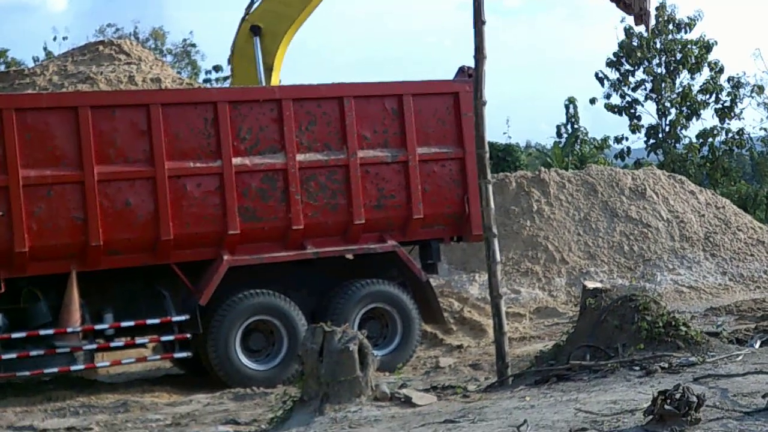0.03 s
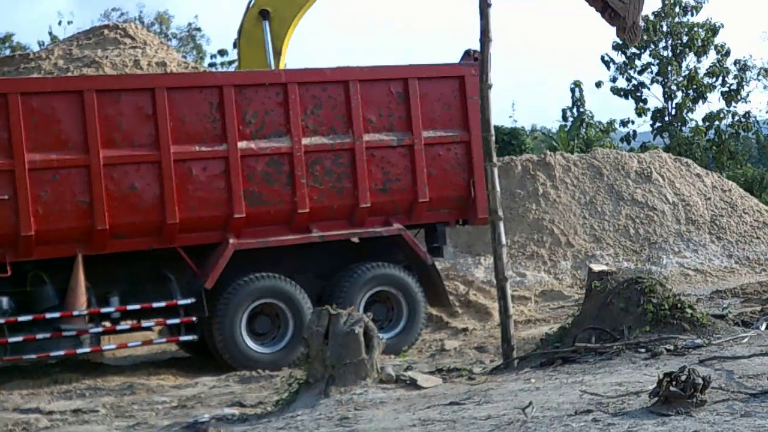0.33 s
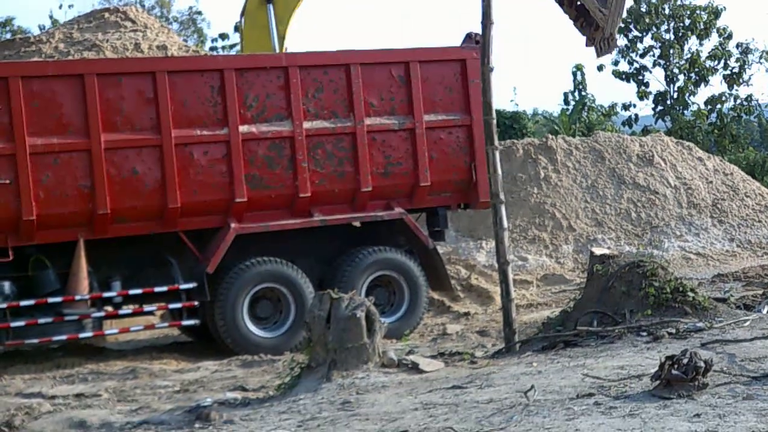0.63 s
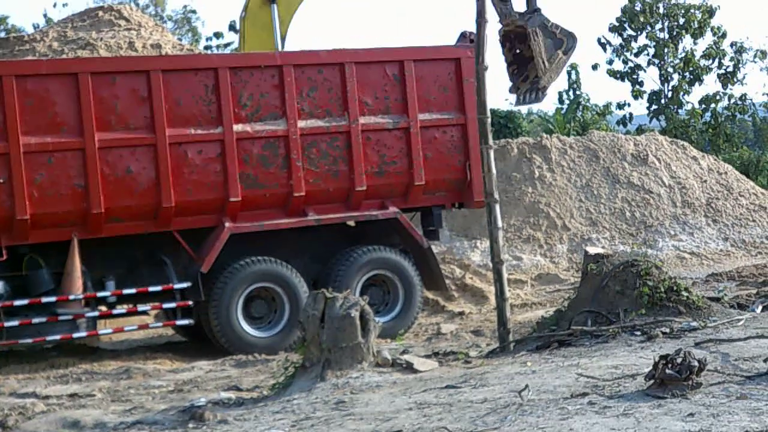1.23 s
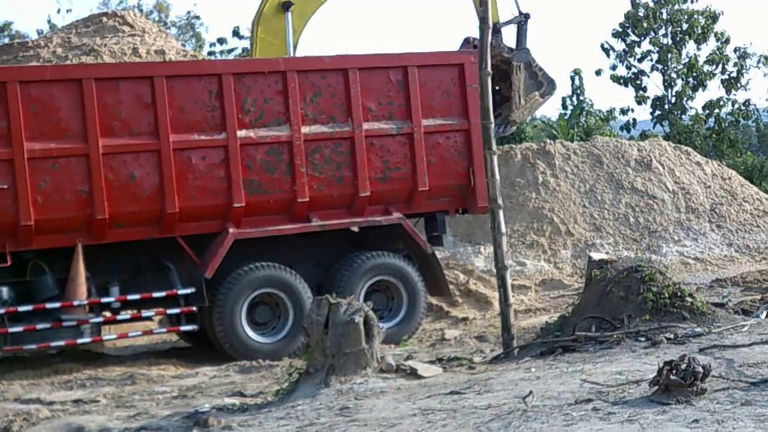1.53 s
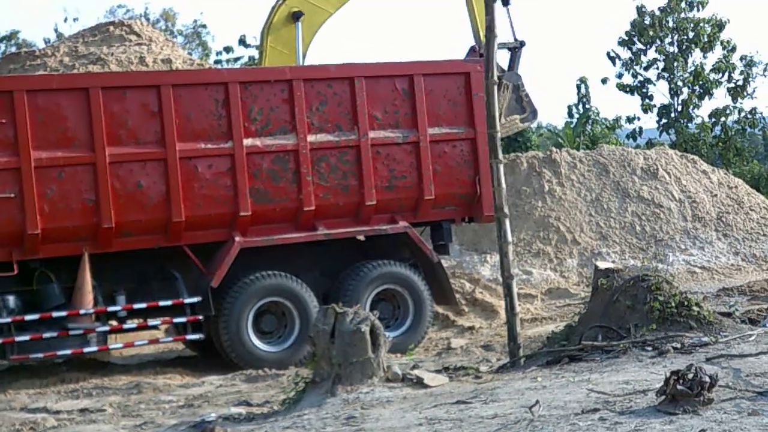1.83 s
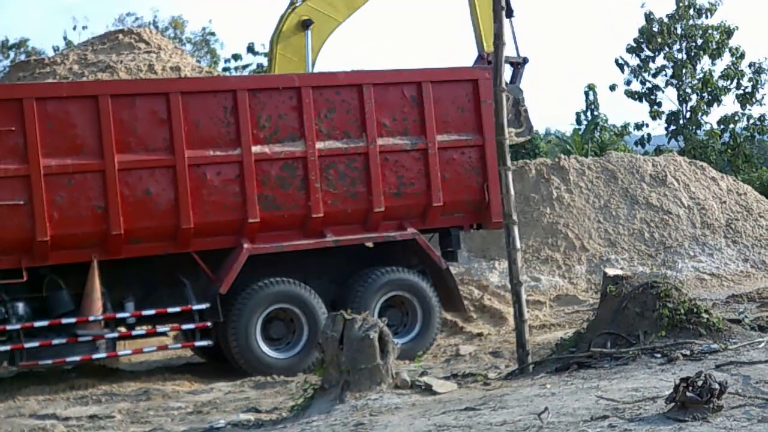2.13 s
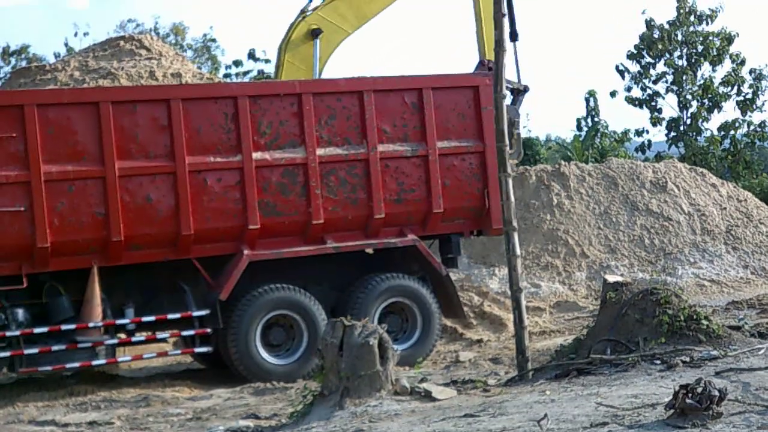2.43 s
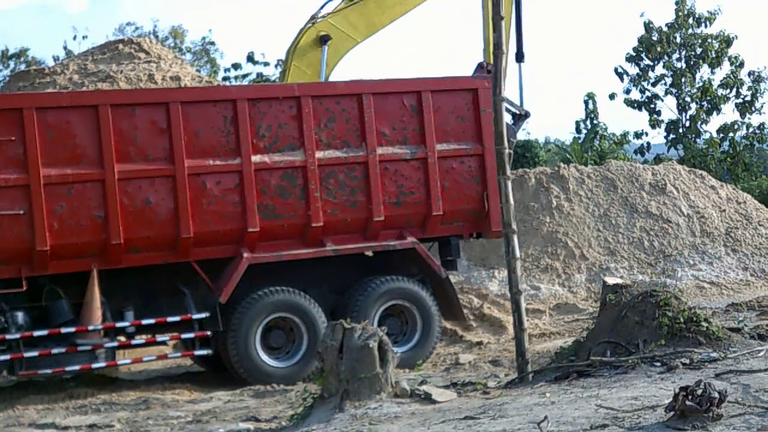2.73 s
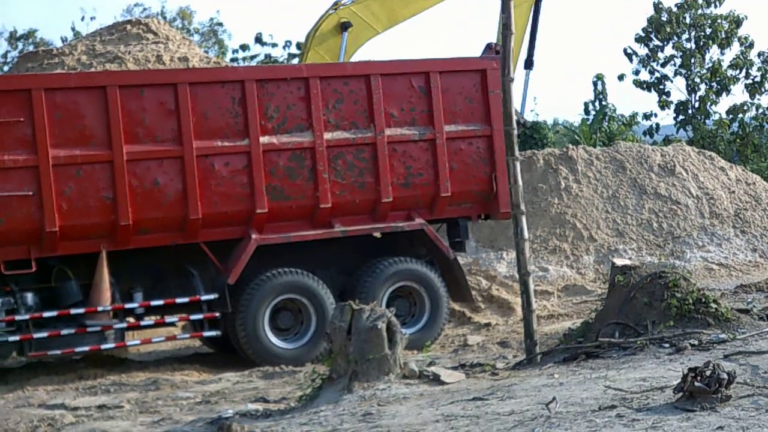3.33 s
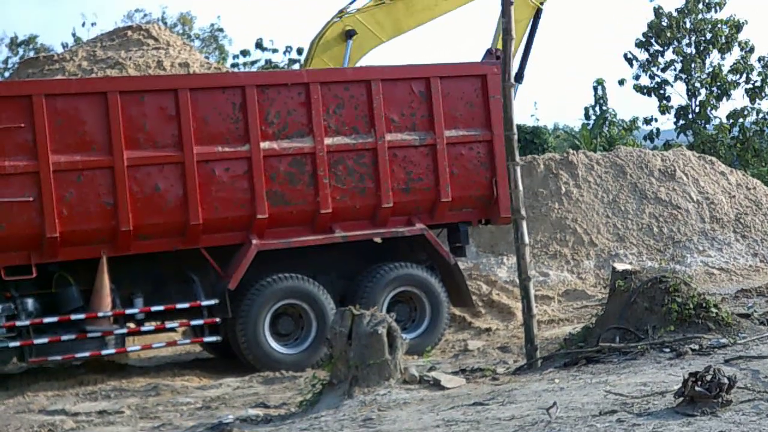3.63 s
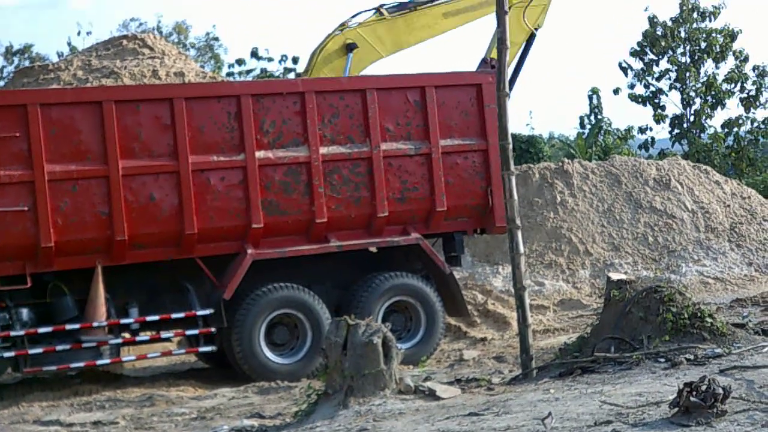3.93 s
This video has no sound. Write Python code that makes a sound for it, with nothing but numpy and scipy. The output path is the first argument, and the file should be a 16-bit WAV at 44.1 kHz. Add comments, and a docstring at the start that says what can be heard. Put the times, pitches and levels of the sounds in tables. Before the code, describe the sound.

An excavator's diesel engine drones and clatters for the whole four seconds, with faint hydraulic groans and whistles and a dump truck's low idle beneath. The engine sags slightly around 2.1 and 3.5 seconds. The steel bucket clanks in a quick cluster from about 2.1 to 2.6 seconds, then knocks lightly at 3.3. A distant bird chirps, barely audible, between 1.6 and 2.7 seconds.

```python
"""An excavator's diesel drones with fan and hydraulic pump, sagging twice under load.
Firings, pump and fan follow one crank; clatter rings the housing; the hydraulics groan and whistle.
A dump truck idles alongside: slow throb, injector ticks. From about 2 s the steel bucket clanks
in its linkage, ringing its modes and plates over open sandy ground. A small bird chirps far off."""
import sys
import numpy as np
from scipy import signal
from scipy.fft import rfft, irfft
from scipy.io import wavfile

SR = 44100
rng = np.random.default_rng(int(sys.argv[2]) if len(sys.argv) > 2 else 0)


def output_pcm(signal):
    """Save a mono or channel-first signal as 16-bit PCM at the path in sys.argv[1].

    Samples are clipped to [-1, 1] before scaling.
    """
    pcm = np.clip(np.atleast_2d(signal).T, -1, 1) * 32767
    wavfile.write(sys.argv[1], SR, np.round(pcm).astype(np.int16))


N = 176400
T = np.arange(N) / SR

# excavator firing rate: t/s, f/Hz
FIRING_HZ = [(0, 100.8), (.5, 100.1), (.7, 100.6), (1.3, 100.8), (1.7, 100.2), (2.12, 95.7), (2.55, 98.3),
             (2.9, 99.6), (3.1, 98.4), (3.3, 95.3), (3.5, 93.2), (3.75, 94.2), (4, 94.5)]
# firing note: t/s, level/dB
EXHAUST_DB = [(0, -27.5), (.7, -31), (1.15, -36.5), (1.5, -35), (1.8, -34.5), (2.4, -33.5), (3.0, -32),
              (3.35, -31.5), (3.6, -31), (4, -30)]
# weaker engine tones: multiple of crank rate, level/dB
ENGINE_ORDERS = [(1.5, -41), (2, -42), (4, -48), (4.5, -43.5), (5, -41), (6, -47)]
# pump tone: t/s, level/dB
PUMP_DB = [(0, -48), (1.1, -46), (1.35, -40), (1.75, -39), (2.0, -48), (2.8, -44), (3.3, -45.5), (3.6, -40),
           (3.85, -40.5), (4, -33.5)]
# fan tones: multiple of blade rate, level/dB
FAN_HARMONICS = [(1, -42), (2, -54.5), (3, -59.5)]
# fan gain as the cab swings: t/s, gain/dB
FAN_SWELL_DB = [(0, -4.5), (.25, 2), (.6, -0.5), (1.0, -2), (1.5, 3), (2.1, -1.5), (3.0, -1.5), (4, -3.5)]
# engine clatter: f/Hz, relative density/dB
CLATTER_SPECTRUM = [(210, -31.5), (310, -4.5), (355, 0), (435, -7.5), (475, -3.5), (520, -2), (584, -2),
                    (638, -1), (718, -1), (785, -5.5), (857, -9.5), (1040, -18), (1210, -21.5), (1440, -13),
                    (1670, -18), (1920, -23.5), (2250, -22.5), (2510, -28.5), (2770, -34), (2990, -40),
                    (3470, -43.5), (3680, -61), (4780, -67), (8100, -100)]
# engine clatter: t/s, level/dB
CLATTER_DB = [(0, -44), (.8, -44.5), (1.5, -44), (2.0, -44), (2.7, -42), (3.3, -43.5), (4, -45)]
# engine housing panels: f/Hz, width/Hz, level/dB
HOUSING_MODES = [(1392, 24, -66), (1515, 40, -61.5), (1600, 54, -73.5), (1745, 16, -71), (2050, 17, -74.5),
                 (2413, 10, -79.5), (2435, 30, -77), (2680, 11, -76)]
# exhaust rumble: f/Hz, relative density/dB
RUMBLE_SPECTRUM = [(12, -28.5), (24, -12.5), (33, -8.5), (39, -1), (46, 2.5), (54, -4), (63, 1.5),
                   (82, -3.5), (110, -4), (150, -5), (190, -6), (215, -6.5), (255, -9), (290, -11.5),
                   (330, -16.5), (400, -35), (600, -52.5)]
# exhaust rumble: t/s, level/dB
RUMBLE_DB = [(0, -30), (.55, -35), (1.0, -30), (1.35, -32), (2.1, -31), (2.7, -30.5), (3.1, -31.5),
             (4, -29)]
# hydraulic groans and whistles: t/s, length/s, start f/Hz, end f/Hz, level/dB
HYDRAULIC_GLIDES = [(.15, 0.51, 701.6, 660.5, -55), (.15, 0.33, 640, 631, -56.5),
                    (.4, 0.19, 212.4, 195.5, -33), (.42, 0.48, 609, 588, -51),
                    (.64, 0.26, 214.2, 216.2, -38), (.8, 0.34, 748, 737, -49), (1.1, 0.72, 732, 719.3, -48),
                    (1.15, 0.29, 130.8, 132.8, -37.5), (2.7, 0.4, 720.5, 708, -48),
                    (2.85, 0.24, 190, 180.7, -37), (3.42, .3, 833, 835, -51),
                    (3.45, 0.34, 186.5, 190.5, -40)]
# bucket knocks: t/s, gain/dB, brightness/Hz, struck-spot f/Hz, spot boost/dB, mode gain/dB
KNOCKS = [(2.088, -34, 1400, 1450, 3, 3), (2.106, -25, 1800, 1550, 0.5, -6),
          (2.111, -24.5, 680, 548.5, 16.5, -1.5), (2.119, -21, 398, 342, 2, -5.5),
          (2.219, -31.5, 1870, 1160, 7, -5.5), (2.271, -27.5, 1500, 800, 2, -3),
          (2.2936, -22, 7050, 1535, 7, -2.5), (2.301, -23, 2500, 703, 7.5, -7),
          (2.316, -27.5, 1104, 451, 16, -5.5), (2.331, -17, 300, 148, 4, -7.5),
          (2.356, -38, 2560, 437, 10, 3), (2.396, -37, 1500, 1140, 8, -11),
          (2.480, -32, 6990, 820, 12, -4.5), (2.612, -45, 1920, 1420, 9.5, 2.5),
          (2.638, -36, 2440, 1420, 6, 0.5), (2.655, -43, 1880, 1420, 8, -4),
          (3.284, -33.5, 1600, 1044, 18.5, -7), (3.298, -31, 700, 350, 3, -4.5)]
# bucket modes: f/Hz, relative level/dB, t60/s
BUCKET_MODES = [(145.5, -11, 0.61), (362.3, -9, 0.26), (436, -9, 0.36), (532, -10.5, 0.29), (566, -7, 0.11),
                (627, -17.5, 0.14), (676, -7, 0.39), (715, -1.5, 0.18), (817, -6.5, 0.15),
                (1022, -25.5, 0.093), (1080, -27, 0.083), (1387, -10.5, 0.08), (1445, -12.5, 0.15),
                (1577, -10, .11), (1750, -18.5, 0.11), (2030, -16, .06), (2630, -21.5, 0.14),
                (3800, -29.5, .05), (6090, -23.5, 0.031)]
# dense ring of the bucket plates: f/Hz, relative density/dB
PLATE_SPECTRUM = [(70, 0.5), (150, 0), (300, 1), (700, -1.5), (900, -9.5), (1060, -22.5), (1550, -11.5),
                  (2000, -16), (2700, -16.5), (3400, -28.5), (4300, -33), (5100, -47.5), (6200, -34.5),
                  (7600, -43), (9000, -55)]
# truck throb: multiple of firing rate, level/dB
IDLE_HARMONICS = [(2, -35.5), (3, -45), (4, -43.5), (5, -47)]
# injector ticks, three cylinders in turn: gain/dB
INJECTOR_DB = [-80, -70.5, -75]
# injector tick: f/Hz, relative density/dB
TICK_SPECTRUM = [(1500, -8), (2700, 1), (3100, -1), (3450, 2), (3700, -4.5), (4100, -9), (4800, -25),
                 (5500, -21), (6000, -15), (6500, -19), (7200, -12), (8000, -20.5), (9000, -30.5)]
# bird chirps: t/s, length/s, start f/Hz, end f/Hz, level/dB
BIRD_GLIDES = [(1.575, .025, 2450, 2400, -68), (1.598, .024, 2500, 3050, -65),
               (1.614, .02, 3120, 2800, -64), (1.63, .025, 2780, 2830, -65),
               (2.196, .04, 3600, 2950, -64.5), (2.594, .036, 3650, 3050, -68),
               (2.687, .025, 4600, 3900, -81), (2.704, .034, 3700, 2850, -64)]

FIRINGS_PER_TURN, PUMP_PISTONS, FAN_BLADES_PER_TURN = 3, 9, 7.215
CONTACT_CYCLES, MAX_CONTACT_S = 5, .003
MODES_DB, SPOT_WIDTH_OCT, BOOM_DB, BOOM_Q = -2.5, 0.067, -5, 11
PLATES_DB, PLATES_T60_S = -0.5, 0.067
YARD_DB, YARD_T60_S, YARD_CUT_HZ = -10.5, 0.55, 3200
IDLE_HZ, FIRST_TICK_S = 20.63, .028
TICK_RISE_S, TICK_DECAY_S, TICK_SPREAD_DB, TICK_FLOOR_DB = .004, 0.0096, 1.3, -74
CUTOFF_HZ = 8400


def excavator():
    """One crank paces exhaust tones, pump, fan and clatter; rumble and hydraulics run free."""
    firings = np.cumsum(curve(FIRING_HZ)) / SR
    turns = firings / FIRINGS_PER_TURN
    return exhaust(firings, turns) + pump(turns) + fan(turns) + clatter(firings) + rumble() + hydraulics()


def exhaust(firings, turns):
    """Firing note plus weaker crank orders."""
    note = from_db(curve(EXHAUST_DB)) * tone(firings, waver_db=-0.13, jitter_rad=0.43)
    return note + sum(from_db(db) * tone(k * turns, waver_db=2.5) for k, db in ENGINE_ORDERS)


def pump(turns):
    """Hydraulic pump whine at the piston rate."""
    return from_db(curve(PUMP_DB)) * tone(PUMP_PISTONS * turns, jitter_rad=.15)


def fan(turns):
    """Blade-pass harmonics, swelling as the cab swings."""
    passes = FAN_BLADES_PER_TURN * turns
    hum = sum(from_db(db) * tone(k * passes, jitter_rad=.22) for k, db in FAN_HARMONICS)
    return from_db(curve(FAN_SWELL_DB)) * hum


def clatter(firings):
    """Mechanical noise pulses with the firings and rings the housing panels."""
    pulsing = rms_one(from_db(1.8 * np.cos(2 * np.pi * firings) + 0.5 * drift(52)))
    rattle = from_db(curve(CLATTER_DB)) * noise(CLATTER_SPECTRUM) * pulsing
    drive = np.diff(rattle, 2, prepend=[0, 0])
    return rattle + sum(from_db(db) * resonate(drive, hz, width_hz) for hz, width_hz, db in HOUSING_MODES)


def rumble():
    """Low exhaust noise."""
    return from_db(curve(RUMBLE_DB)) * noise(RUMBLE_SPECTRUM)


def hydraulics():
    """Brief, nearly pure groans and whistles."""
    return glides(HYDRAULIC_GLIDES, jitter_rad=0.12, flutter_db=1.0)


def bucket():
    """Knocks ring modes and plates; soft contacts are slower and duller. The yard scatters a tail."""
    out, plates = np.zeros(N), noise(PLATE_SPECTRUM)
    scatter = lowpass(noise(PLATE_SPECTRUM), YARD_CUT_HZ)
    hz, mode_db, t60_s = np.transpose(BUCKET_MODES)[:, :, None]
    age_s = T[:SR]
    for start_s, db, bright_hz, spot_hz, spot_db, ring_db in KNOCKS:
        contact_s = min(CONTACT_CYCLES / bright_hz, MAX_CONTACT_S)
        onset = np.sin(np.pi / 2 * np.minimum(age_s / contact_s, 1)) ** 2
        boost_db = spot_db * np.exp(-(np.log2(hz / spot_hz) / SPOT_WIDTH_OCT) ** 2)
        decay = from_db(ring_db + mode_db + boost_db - 60 * age_s / t60_s)
        modes = np.sum(rng.choice([-1, 1], hz.shape) * decay * np.sin(2 * np.pi * hz * age_s), axis=0)
        crash = from_db(PLATES_DB - 60 * age_s / PLATES_T60_S) * np.roll(plates, rng.integers(N))[:SR]
        tail = from_db(YARD_DB - 60 * age_s / YARD_T60_S) * np.roll(scatter, rng.integers(N))[:SR]
        spot_filter = signal.iirpeak(spot_hz, BOOM_Q, fs=SR)
        boom = from_db(BOOM_DB + spot_db) * signal.lfilter(*spot_filter, crash)
        knock = lowpass(onset * (modes + crash + boom + tail), bright_hz)
        start = int(start_s * SR)
        out[start:start + SR] += from_db(db) * knock[:N - start]
    return out


def truck():
    """Low idle throb; an injector ticks on each firing, one in three louder."""
    firings = (T - FIRST_TICK_S) * IDLE_HZ
    throb = sum(from_db(db) * tone(k * firings) for k, db in IDLE_HARMONICS)
    tick_index = np.floor(firings).astype(int) + 1
    age_s = firings % 1 / IDLE_HZ
    cylinder_db = np.array(INJECTOR_DB)[(tick_index - 1) % len(INJECTOR_DB)]
    spread_db = TICK_SPREAD_DB * rng.standard_normal(tick_index.max() + 1)[tick_index]
    envelope = 2 * (1 - np.exp(-age_s / TICK_RISE_S)) * np.exp(-age_s / TICK_DECAY_S)
    ticks = from_db(cylinder_db + spread_db) * envelope
    return throb + (ticks + from_db(TICK_FLOOR_DB)) * noise(TICK_SPECTRUM)


def bird():
    """Faint, fluttering chirps."""
    return glides(BIRD_GLIDES, jitter_rad=0.68, flutter_db=4.0)


def tone(cycles, waver_db=2.0, jitter_rad=.2):
    """Partial on a running cycle count, wavering in level and phase; rms 1."""
    waver = from_db(waver_db * drift(4.7))
    phase = 2 * np.pi * (cycles + rng.random()) + jitter_rad * drift(7.4)
    return rms_one(waver * np.sin(phase))


def glides(rows, jitter_rad, flutter_db):
    """Short gliding tones that swell, flutter and fade."""
    out = np.zeros(N)
    for start_s, length_s, start_hz, end_hz, db in rows:
        on = (T > start_s) & (T < start_s + length_s)
        along = (T[on] - start_s) / length_s
        cycles = np.cumsum(start_hz + (end_hz - start_hz) * along) / SR
        arch = np.sqrt(np.abs(2 * np.sin(np.pi * along)))
        swell = from_db(db + flutter_db * drift(2 / length_s)[on]) * arch
        out[on] += swell * np.sin(2 * np.pi * cycles + jitter_rad * drift(2 / length_s)[on])
    return out


def drift(rate_hz):
    """Slow random wander, rms 1."""
    hop, settle = 40, 2000
    r = np.exp(-2 * np.pi * rate_hz * hop / SR)
    slow = signal.lfilter([1], [1, -2 * r, r * r], rng.standard_normal(N // hop + settle + 2))[settle:]
    return np.interp(np.arange(N) / hop, np.arange(len(slow)), rms_one(slow))


def noise(spectrum):
    """Coloured noise, rms 1."""
    hz, db = np.transpose(spectrum)
    log_hz = np.log(np.maximum(np.arange(N // 2 + 1) * SR / N, 1))
    gain = from_db(np.interp(log_hz, np.log(hz), db, left=-90, right=-90))
    return rms_one(irfft(rfft(rng.standard_normal(N)) * gain, N))


def resonate(x, hz, width_hz):
    """One resonance driven by x, rms 1."""
    r = np.exp(-np.pi * width_hz / SR)
    return rms_one(signal.lfilter([1, 0, -1], [1, -2 * r * np.cos(2 * np.pi * hz / SR), r * r], x))


def lowpass(x, hz, order=2):
    return signal.sosfilt(signal.butter(order, hz, fs=SR, output="sos"), x)


def curve(rows):
    return np.interp(T, *np.transpose(rows))


def from_db(db):
    return np.exp(np.asarray(db) * (np.log(10) / 20))


def rms_one(x):
    return x / np.sqrt(np.mean(x ** 2) + 1e-20)


def scene():
    """Both machines, bucket and bird; mono."""
    return (excavator() + truck() + bucket() + bird())[None]


def record(dry):
    """Steep treble cut."""
    return lowpass(dry, CUTOFF_HZ, order=16)


dry = scene()
out = record(dry)
output_pcm(out)
```